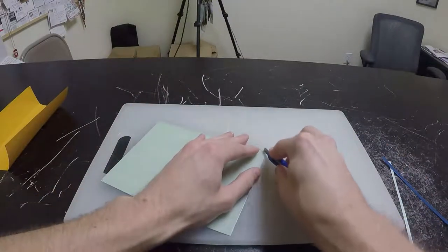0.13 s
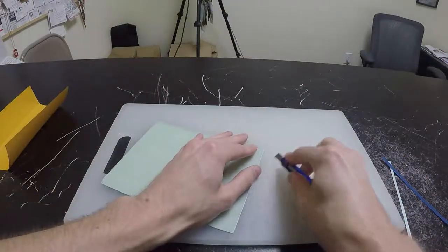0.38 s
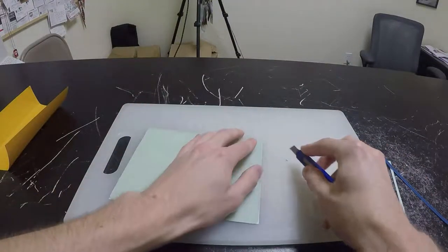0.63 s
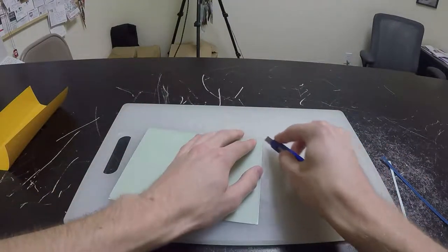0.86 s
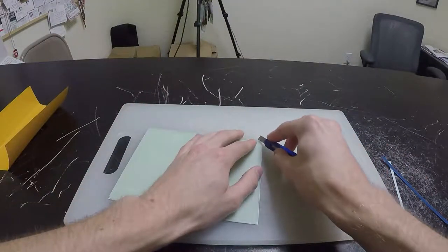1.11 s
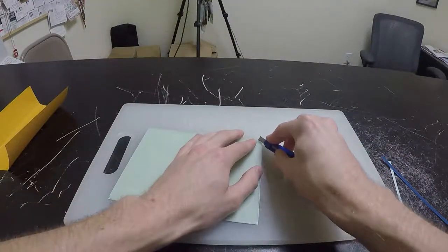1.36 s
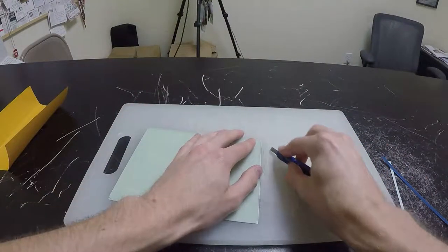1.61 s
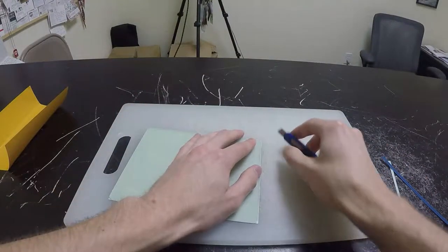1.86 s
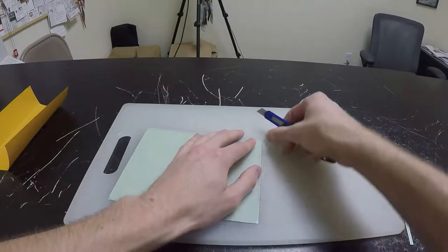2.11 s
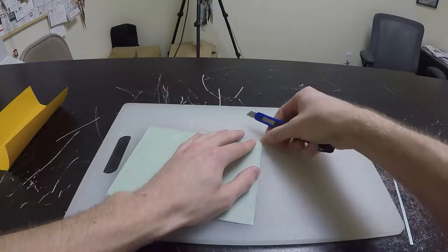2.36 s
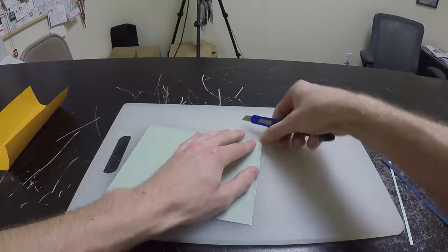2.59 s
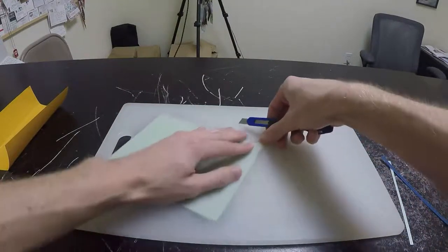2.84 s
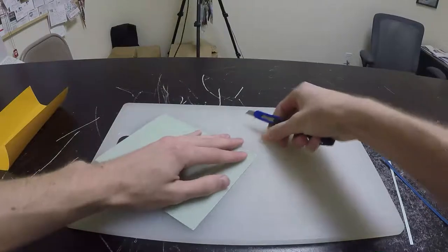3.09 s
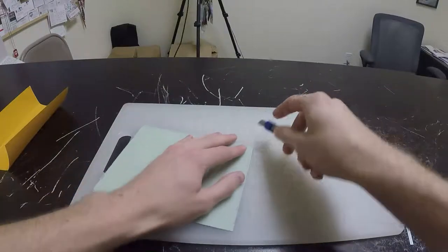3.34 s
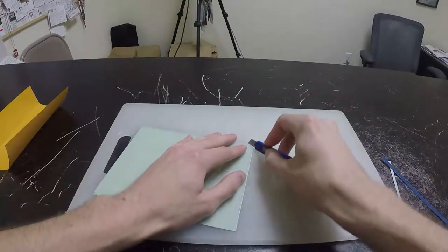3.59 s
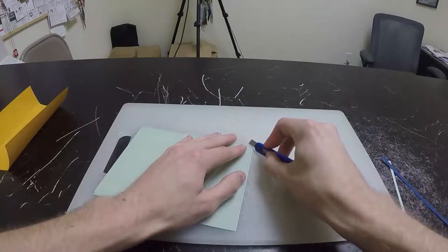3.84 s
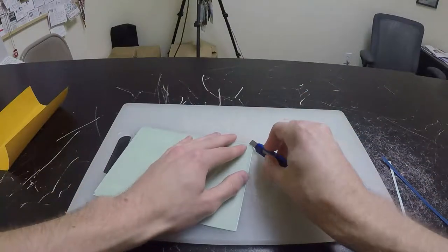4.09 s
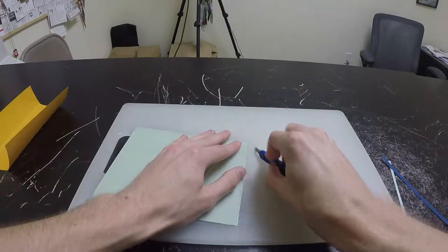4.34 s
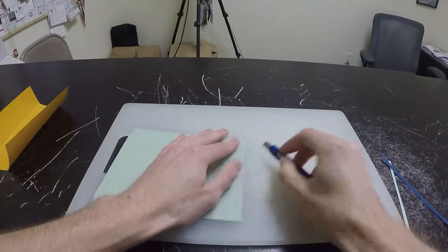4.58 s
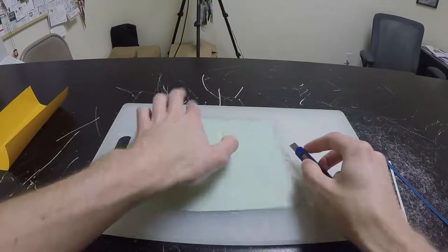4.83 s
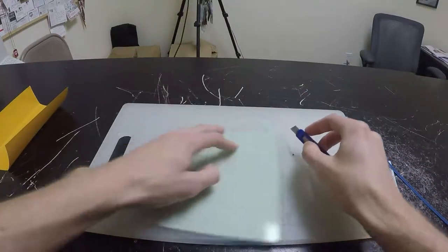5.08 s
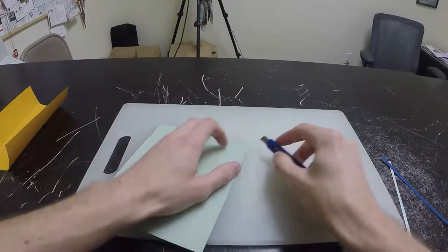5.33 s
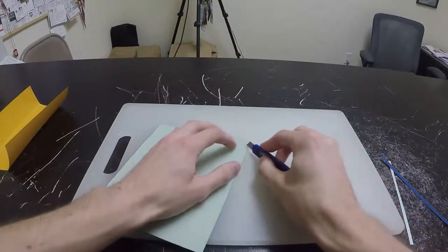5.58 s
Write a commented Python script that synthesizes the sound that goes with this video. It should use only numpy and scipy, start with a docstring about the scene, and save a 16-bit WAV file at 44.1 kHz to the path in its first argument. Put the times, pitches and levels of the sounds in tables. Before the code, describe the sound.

In a quiet small office with low air rumble and faint hum, a hard knock on a plastic board opens, followed by blade rattles and soft table thumps. Paper hisses faintly, a second loud crack lands just before three seconds with a swish, then the strongest paper slides come between four and five seconds. Two faint clicks finish. Close microphone, identical in both channels.

```python
"""A hand shifts a paper sheet on a plastic cutting board and works a snap-blade knife in a quiet office.
Ventilation noise and a 120 Hz hum run throughout. A knock opens: a broadband crack excites board modes.
Blade clicks follow, contact ticks ringing the knife; arm bumps swing low table modes. From half a second
the sheet hisses by stick-slip friction, then come more rattles and knocks. The strongest strokes fall
between four and five seconds; two faint blade clicks end the scene. Sparse reflections form the room."""
import sys
import numpy as np
from scipy import signal
from scipy.fft import rfft, irfft
from scipy.io import wavfile
from scipy.ndimage import uniform_filter1d

SR = 44100
rng = np.random.default_rng(int(sys.argv[2]) if len(sys.argv) > 2 else 0)


def field_ratio(decibels):
    """Amplitude ratio for a level in dB (20 dB per decade); scalars and array-likes work."""
    return 10 ** (np.asarray(decibels, dtype=float) / 20)


def unload_wav(signal):
    """Save mono or channel-first audio to the path in sys.argv[1] as 16-bit WAV at rate SR, clipped to [-1, 1]."""
    wavfile.write(
        sys.argv[1],
        SR,
        np.round(np.clip(np.atleast_2d(signal).T, -1, 1) * 32767).astype(np.int16),
    )


N = 251370  # samples, 5.7 s


def evened(x):
    """Normalization: scales a signal to unit rms."""
    return x / np.sqrt(np.mean(x ** 2) + 1e-20)


def read(points, hz):
    """Interpolates a spectrum linearly on a log-frequency axis."""
    f, value = np.transpose(points)
    return np.interp(np.log(hz + 1), np.log(f + 1), value)


def add(mix, s, sound):
    """Superposition: adds a sound to the mix at time s."""
    part = mix[round(s * SR):][:len(sound)]
    part += sound[:len(part)]


def coloured(x, points):
    """Linear filtering: multiplies the spectrum by a tabulated gain, then restores unit rms."""
    gain = field_ratio(read(points, np.fft.rfftfreq(len(x), 1 / SR)))
    return evened(irfft(rfft(x) * gain, len(x)))


def slow(hz):
    """Low-pass random process: white noise smoothed twice over 1 / hz seconds, unit rms."""
    span = int(SR / hz)
    once = uniform_filter1d(rng.standard_normal(N), span)
    return evened(uniform_filter1d(once, span))


def ring(hz, db, t60, phase=0., size=12000):
    """Free vibration of one damped mode: a sinusoid with exponential decay."""
    t = np.arange(size) / SR
    return field_ratio(db - 60 * t / max(t60, 1e-3)) * np.sin(2 * np.pi * hz * t + phase)


def slides():
    """Stick-slip friction: dense fibre catches of uneven size make the hiss and drive the board modes."""
    # strokes of the sheet: fastest moment t/s, speeding up t/s, slowing down t/s,
    # hiss level/dB, board drone level re hiss/dB
    sheet_strokes = [(0.51, 0.1, .1, -56, -2), (0.73, 0.44, 0.31, -63, 0), (2.0, .05, 0.069, -77, 8),
                     (2.28, .12, 0.062, -68.5, 4), (2.69, 0.11, 0.19, -58, 2.5),
                     (2.82, 0.17, 0.14, -55.5, 0.5), (2.87, 0.027, 0.18, -42.5, 0.5),
                     (3.19, 0.11, 0.15, -56, 3), (3.269, 0.22, 0.16, -48.5, -0.5),
                     (4.316, 0.014, 0.067, -40.5, -7), (4.6, .07, 0.051, -48.5, -5),
                     (4.64, 0.088, 0.12, -43, -23), (4.689, 0.13, 0.15, -36, -13),
                     (4.83, 0.11, 0.12, -51, -3.5), (5.041, 0.14, 0.33, -45, -8.5),
                     (5.15, 0.34, 0.11, -44.5, -8.5)]
    # lifted paper edge brushing lightly: strongest moment t/s, swelling t/s, fading t/s, level/dB
    edge_brushes = [(0.42, .05, 0.071, -65), (0.73, 0.71, .4, -64.5), (1.49, 0.065, 0.055, -64),
                    (2.868, .005, 0.19, -60), (4.715, .09, 0.16, -53)]
    # spectrum of paper on plastic: f/Hz, relative density level/dB per Hz
    rub_spectrum = [(300, -28), (700, -40), (1200, -6.5), (2000, 1.5), (2800, 3), (4400, 4.5), (6500, -6),
                    (10000, -25.5), (16000, -109)]
    # spectrum of the paper edge: f/Hz, relative density level/dB per Hz
    edge_spectrum = [(3000, -22), (6000, 0.5), (8000, -4), (11000, -3.5), (14000, -6), (17000, -18)]
    # board modes under the sheet: f/Hz, bandwidth/Hz, relative level/dB
    drone_modes = [(391.4, 23, -1), (850, 4500, -10), (1635, 257, 4.5), (2480, 2500, 5), (3300, 1200, -15),
                   (4200, 180, -40)]
    drone_growth = 0.79  # the board rises and sinks by only this share of the hiss's swing in dB
    edge_db = -18  # crisp paper edge re hiss in every stroke

    # overlapping strokes add in power
    press = np.sqrt(sum(stroke(*row[:4]) for row in sheet_strokes))
    boom = np.sqrt(sum(stroke(s, rise, fall, db + drone_db, drone_growth)
                       for s, rise, fall, db, drone_db in sheet_strokes))
    brush_power = sum(stroke(*row) for row in edge_brushes)
    crisp = np.sqrt(brush_power + (field_ratio(edge_db) * press) ** 2)

    catch_size = field_ratio(3.4 * np.minimum(rng.exponential(1, N), 4))
    grains = rng.standard_normal(N) * catch_size * field_ratio(1.14 * slow(93))
    hiss = crinkled(coloured(grains, rub_spectrum) + 0.25 * flutter(grains))
    edge = coloured(grains, edge_spectrum)
    # decay time is inverse to bandwidth
    modes = sum(ring(hz, db, 2.03 / width, size=4000) * np.sqrt(width) for hz, width, db in drone_modes)
    drone = evened(signal.oaconvolve(grains, modes)[:N])
    return press * hiss + crisp * edge + boom * drone


def stroke(s, rise, fall, db, growth=1):
    """Amplitude modulation: the power of one stroke, swelling and fading about its fastest moment."""
    drop_db, curve = 34, 1.61  # fall from the middle to either end of a stroke at growth 1, along a power law
    t = np.arange(N) / SR
    away = np.where(t < s, (s - t) / rise, (t - s) / fall)
    within_db = growth * drop_db * away ** curve
    beyond_db = 100 * np.maximum(away - 1, 0)
    return field_ratio(db - np.minimum(within_db + beyond_db, 200)) ** 2


def flutter(grains):
    """Time-varying resonance: the free part of the sheet colours the hiss about a drifting centre."""
    centre_hz, wander_hz, width_hz = 2970, 300, 1800  # mean, rms drift, bandwidth of each of two passes
    hz = centre_hz + wander_hz * slow(2.9)
    turn = np.exp(2j * np.pi * np.cumsum(hz) / SR)
    r = np.exp(-np.pi * width_hz / SR)
    # shift the centre to zero frequency, low-pass twice, shift back
    once = signal.lfilter([1 - r], [1, -r], grains / turn)
    twice = signal.lfilter([1 - r], [1, -r], once)
    return evened((turn * twice).real)


def crinkled(x):
    """Time-frequency modulation: patches of sheet catch and let go, so bands of hiss come and go."""
    depth_db = 2.5  # rms
    z = signal.stft(x, nperseg=512, noverlap=384)[2]
    # patches span some hundred Hz by some tens of ms
    patches = uniform_filter1d(rng.standard_normal(z.shape), size=7, axis=0)
    patches = evened(uniform_filter1d(patches, size=14, axis=1))
    return evened(signal.istft(z * field_ratio(depth_db * patches), nperseg=512, noverlap=384)[1][:N])


def crack(centre_hz, octaves, t60, rise_s, snap):
    """Impact excitation: one impulse in brief decaying chatter, strongest about centre_hz, peak 1."""
    shelf_db = -29  # every blow keeps a thin treble edge
    t, hz = np.arange(2048) / SR, abs(np.fft.fftfreq(2048, 1 / SR))
    shelf = field_ratio(shelf_db) * hz ** 2 / (hz ** 2 + centre_hz ** 2)
    octaves_off = np.log2((hz + 50) / centre_hz)
    log_gain = np.log(shelf + 1 / (1 + (octaves_off / max(octaves, .1)) ** 4))
    # minimum phase, so the filter is causal: nothing sounds before the blow
    colour = np.fft.ifft(np.exp(np.conj(signal.hilbert(log_gain)))).real
    chatter = rng.standard_normal(2048) * field_ratio(-60 * t / max(t60, .002)) * np.minimum(t / rise_s, 1)
    chatter[round(rise_s * SR)] += snap
    burst = signal.fftconvolve(chatter, colour[:1024])[:2048]
    return burst / abs(burst).max()


def clicks():
    """Modal excitation by contact: each dry tick of the loose blade rings knife modes near its centre."""
    # blade rattling in the handle: t/s, tick peak level/dB, centre f/Hz, bandwidth/octaves,
    # knife ring peak level re tick/dB
    blade_rattles = [(0.1948, -38.5, 3370, 0.13, -11), (0.3605, -27.5, 4500, 0.49, 1),
                     (0.3616, -24, 5660, 0.97, -4), (0.3744, -28.5, 4500, 1, -33),
                     (1.0387, -44.5, 2730, 1, -12), (1.0537, -37, 7100, 1, 0.5), (1.076, -42, 3330, 1, -9),
                     (1.1093, -47, 4600, 0.51, -11), (1.1427, -46.5, 4790, 0.73, -12),
                     (1.6438, -39, 3900, 0.37, -0.5), (1.652, -35, 6450, 0.38, -19),
                     (1.7039, -47, 3800, 1, -12), (1.8216, -44, 4800, 0.64, 1),
                     (1.8316, -39.5, 7000, 0.71, 3.5), (1.8485, -34, 4830, 0.95, -15),
                     (1.8572, -46, 4470, 0.64, -6), (1.879, -40.5, 7700, 0.76, 1.5),
                     (1.8965, -40.5, 7950, 1, 0), (1.904, -35.5, 4830, 0.54, -14),
                     (2.295, -48, 5540, 0.44, -10), (2.7323, -40.5, 3230, 1, -15),
                     (2.8659, -35, 2970, 0.96, -8), (3.067, -49, 3470, 0.76, -9),
                     (3.0868, -45.5, 3210, 1, -10), (3.095, -49, 4500, 1, -12),
                     (3.1682, -37.5, 6550, 0.59, -17), (3.319, -29.5, 5340, 0.61, -17),
                     (3.407, -46.5, 6560, 0.55, -8), (3.423, -38.5, 4940, 0.64, -26),
                     (3.6063, -46.5, 2740, 1, -13), (3.6488, -40, 4300, 0.73, -1.5),
                     (3.6937, -42.5, 3760, 0.92, -13), (3.707, -33, 7350, 0.89, -7),
                     (3.8126, -44, 4070, 0.2, -8), (4.117, -43.5, 4350, 0.5, -18),
                     (4.5128, -34.5, 5630, 0.42, -14), (4.5323, -28.5, 6300, 0.62, -28),
                     (4.744, -34, 3540, 1, -23), (5.6256, -47.5, 2630, 1, -8),
                     (5.6432, -42, 4800, 0.83, -5.5)]
    # mean modes of blade and handle: f/Hz, relative level/dB, t60/s
    knife_modes = [(3600, -1, .012), (4150, 0, .018), (4600, -1, .016), (5400, -2, .012), (6200, -3, .01),
                   (8000, -2, .028), (9100, -3, .018), (10400, -4, .01), (12700, -6, .016),
                   (14200, -4, .01)]
    chatter_t60_s = .015
    bounce_db, bounce_s = -11, .006  # the loose blade lands twice; the interval varies
    out = np.zeros(N)
    for s, db, hz, octaves, ring_db in blade_rattles:
        tick = crack(hz, octaves, chatter_t60_s, rise_s=.0025, snap=3.52)
        modes = 0
        for f, g, ring_t60 in knife_modes:
            mode_hz = f * (1 + .012 * rng.standard_normal())
            mode_db = g + 3 * rng.standard_normal()
            modes = modes + ring(mode_hz, mode_db, ring_t60, size=4000)
        rung = signal.fftconvolve(tick, modes)
        add(out, s, field_ratio(db + ring_db) * rung / abs(rung).max())
        add(out, s, field_ratio(db) * tick)
        second_s = s + bounce_s * rng.uniform(0.45, 1.5)
        second = crack(hz, octaves, chatter_t60_s, rise_s=0.0038, snap=1.1)
        add(out, second_s, field_ratio(db + bounce_db) * second)
    return out


def knocks():
    """Impact on a plate: a sharp crack and the board's low modes, damped by the hand lying on it."""
    # knuckles and knife on the board: t/s, crack peak level/dB, board level before tilt/dB,
    # crack centre f/Hz, bandwidth/octaves
    board_knocks = [(0.0269, -12.5, -30.5, 2310, 1.19), (0.2069, -27.5, -35, 3080, 0.94),
                    (1.5103, -30.5, -38, 3530, 0.48), (2.061, -66, -57.5, 3460, 1.5),
                    (2.2679, -64, -58, 2610, 1.5), (2.8576, -10, -36, 3370, 0.93),
                    (3.9774, -79, -59, 4040, 1.3), (4.0441, -73, -55.5, 4300, 1.5),
                    (4.083, -70, -63, 4000, 1.5), (4.5147, -32, -53.5, 5700, 3.9),
                    (4.8616, -41, -45.5, 2110, 1.7), (4.9485, -37, -48.5, 2930, 1.8),
                    (5.3033, -49.5, -58, 4000, 0.64)]
    # mean modes of the undamped board: f/Hz, relative level before tilt/dB, t60/s
    board_modes = [(175, -33, 0.29), (220.5, 1.5, 0.075), (260, 0, 0.081), (302, 1, 0.047), (353, -7, 0.1),
                   (475, -5.5, 0.039), (556, -5, 0.037), (787, -4, 0.027), (1000, -11, 0.075),
                   (1167, -1, 0.028), (1424, -1, 0.041)]
    free_share, free_per_db = .55, -0.16  # share of free ring time at -13 dB, change per dB of blow
    dull_db_per_octave, sharp_db = -.08, 27  # mode tilt per dB that crack over board falls short of 27 dB
    out = np.zeros(N)
    for s, db, board_db, hz, octaves in board_knocks:
        add(out, s, field_ratio(db) * crack(hz, octaves, .011, rise_s=.0003, snap=6.))
        # a harder blow presses on and damps the board
        freedom = np.clip(free_share + free_per_db * (db + 13), .3, 1)
        tilt_db = dull_db_per_octave * (sharp_db - db + board_db)
        board = 0
        for f, g, t60 in board_modes:
            mode_hz = f * (1 + .03 * rng.standard_normal())
            mode_db = g + tilt_db * np.log2(f / 250) + 1.5 * rng.standard_normal()
            board = board + ring(mode_hz, mode_db, freedom * t60)
        add(out, s + 0.001037, -field_ratio(board_db) * board)
    return out


def bumps():
    """Soft impact: yielding flesh swings two low modes of the table top with a gradual onset."""
    # arms and wrists on the table: t/s, lower mode level before onset/dB, lower mode f/Hz, t60/s
    arm_bumps = [(0.368, -34, 32.8, 0.32), (0.708, -23.5, 55.4, 0.22), (0.79, -24.5, 42, 0.11),
                 (0.836, -37, 52.4, 0.34), (2.059, -42, 29, 0.14), (2.656, -39, 30.4, 0.35),
                 (3.978, -38, 37.5, 0.17), (4.044, -35, 32.5, 0.2), (4.306, -41, 49.5, 0.6),
                 (4.951, -33, 67.7, 0.25), (5.303, -31, 83, 0.16)]
    out = np.zeros(N)
    rise = 1 - np.exp(-np.arange(20000) / SR / 0.0087)
    for s, db, hz, t60 in arm_bumps:
        lower = ring(hz, 0, t60, size=20000)
        upper = ring(1.63 * hz, -1.4, 0.41 * t60, size=20000)
        add(out, s, field_ratio(db) * rise * (lower + upper))
    return out


def office(x):
    """Reverberation: sparse reflections of random sign, each band decaying exponentially at its own rate."""
    # decay of the room: f/Hz, t60/s
    room_decay = [(150, 0.29), (500, 0.54), (2000, 0.25), (5000, 0.32), (12000, 0.18)]
    # reflections dulled by soft furnishings: f/Hz, relative level/dB
    wall_gain = [(100, -1), (2500, -3.5), (6000, -8.5), (16000, -3.5)]
    taps = np.zeros(SR)
    at = np.arange(120, SR - 20, 20)
    taps[at + rng.integers(0, 20, len(at))] = rng.choice([-1., 1.], len(at))
    hz, t, z = signal.stft(taps, SR, nperseg=256)
    decay_db = read(wall_gain, hz)[:, None] - 60 * t / read(room_decay, hz)[:, None]
    tail = signal.istft(z * field_ratio(decay_db), SR, nperseg=256)[1]
    return signal.fftconvolve(x, tail / np.linalg.norm(tail))[:N]


def air():
    """Broadband flow noise plus a tone: ventilation rumble, hiss and a wavering mains hum."""
    # quiet office air: f/Hz, relative density level/dB per Hz
    air_spectrum = [(12, -16), (20, 1), (40, -2.5), (60, -8), (90, -14.5), (120, -18), (160, -21),
                    (250, -27.5), (400, -30), (700, -34.5), (1500, -37.5), (3500, -40), (8000, -46),
                    (16000, -53.5)]
    air_db, hum_db, hum_hz = -50.5, -60, 120  # mean levels and mean frequency
    hum_phase = 2 * np.pi * np.cumsum(hum_hz + 0.58 * slow(1.67)) / SR
    hum = np.sin(hum_phase) * field_ratio(hum_db + 2.37 * slow(9.3))
    swell = field_ratio(.4 * slow(3))
    return field_ratio(air_db) * swell * coloured(rng.standard_normal(N), air_spectrum) + hum


def scene():
    """Superposition of direct sounds, their room and the air; one microphone feeds both channels."""
    knife, board, rub = clicks(), knocks(), slides()
    room = office(field_ratio(-8) * knife + field_ratio(-7.5) * board + field_ratio(-15.0) * rub)
    mono = knife + board + rub + bumps() + room + air()
    return np.array([mono, mono])


def roll_off(x):
    """The treble ends steeply here."""
    return signal.sosfilt(signal.butter(12, 16850, fs=SR, output="sos"), x)


def record(dry):
    """Delivers the two-channel microphone signal at unchanged gain."""
    return roll_off(dry)


dry = scene()
out = record(dry)
unload_wav(out)
```